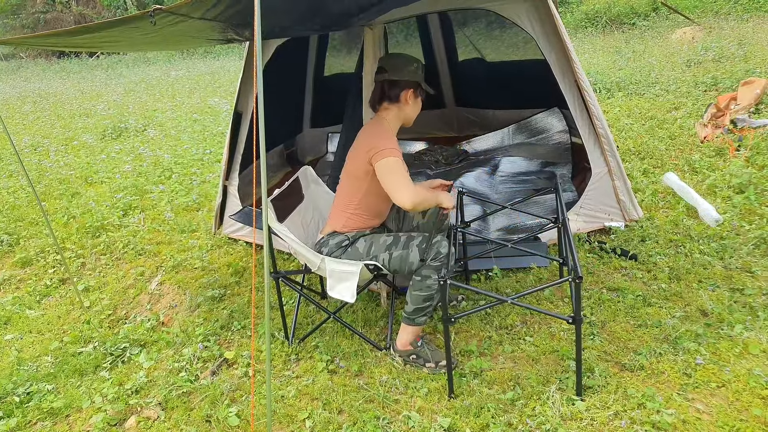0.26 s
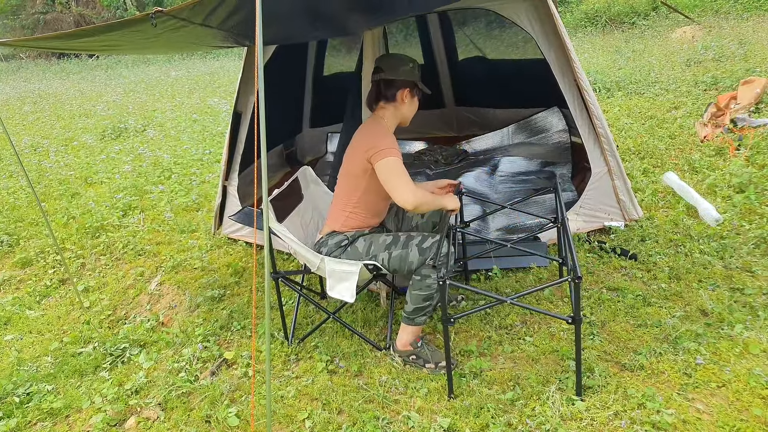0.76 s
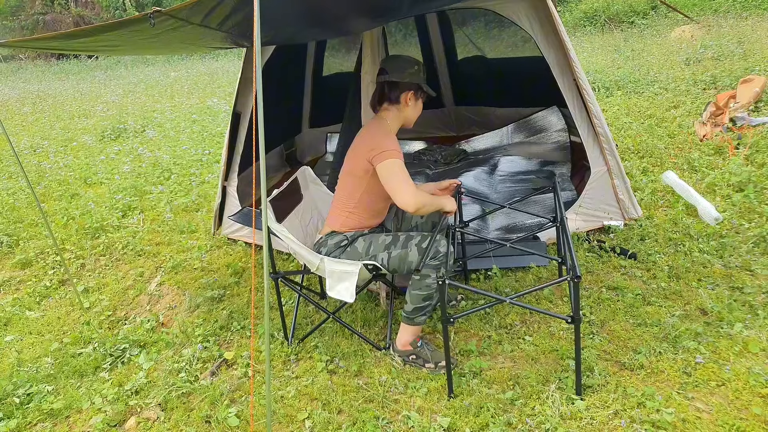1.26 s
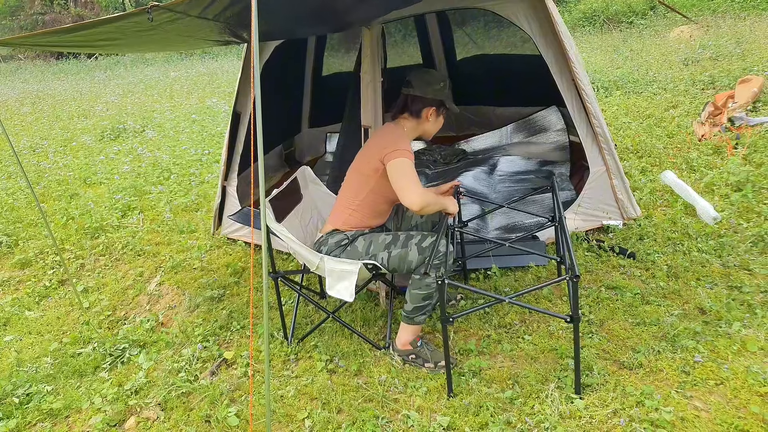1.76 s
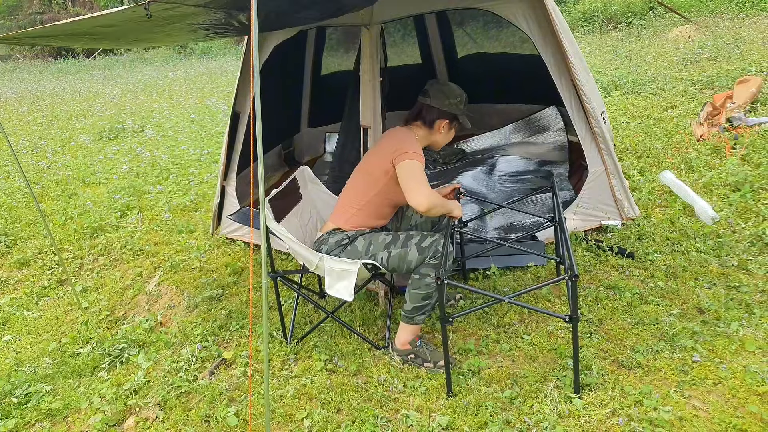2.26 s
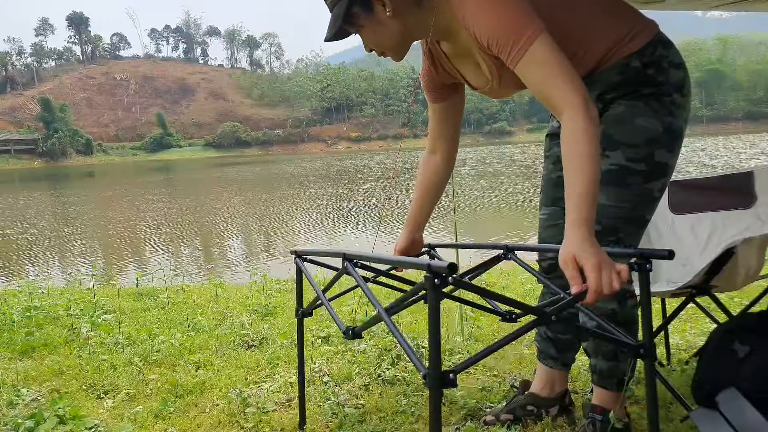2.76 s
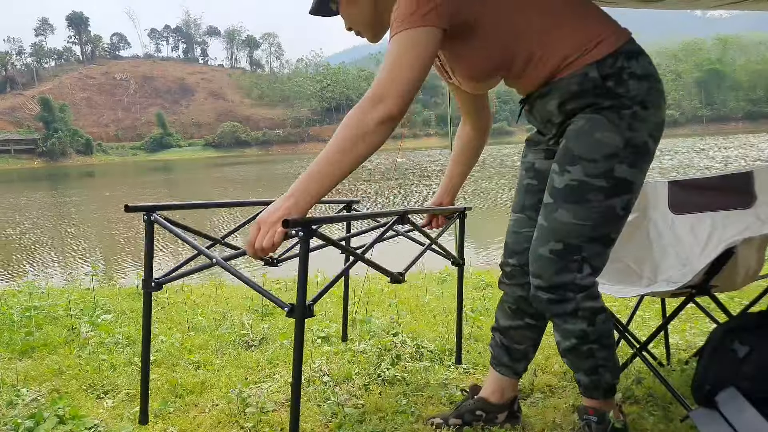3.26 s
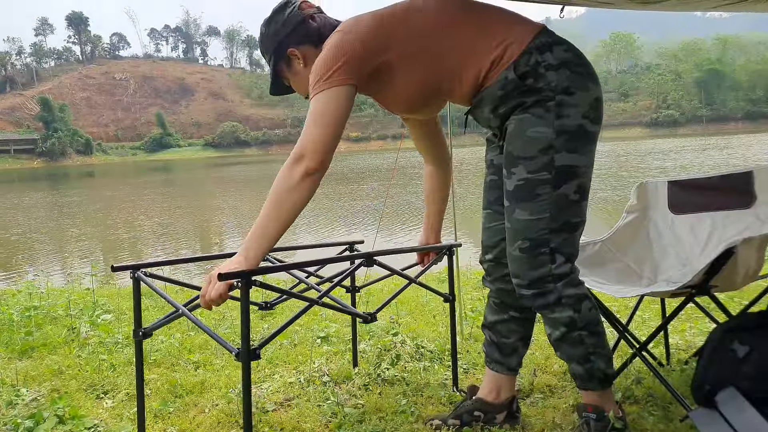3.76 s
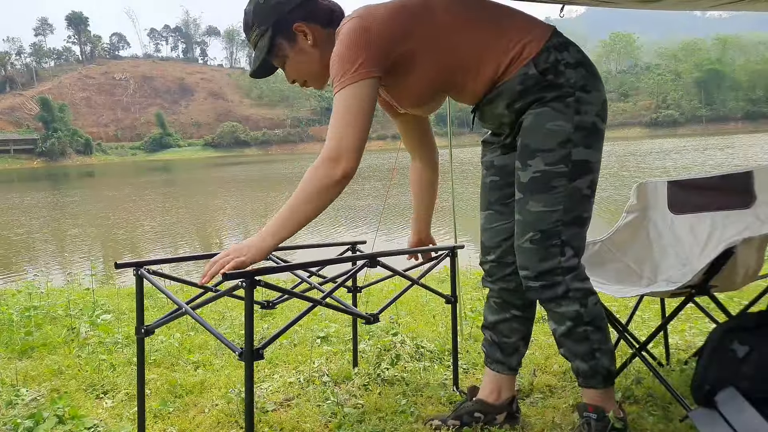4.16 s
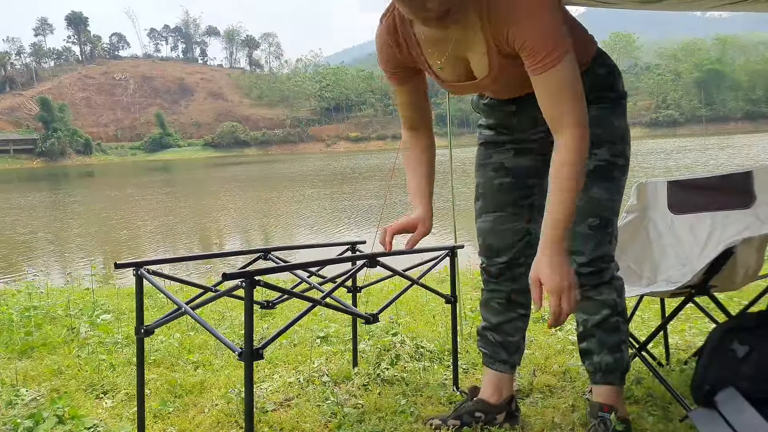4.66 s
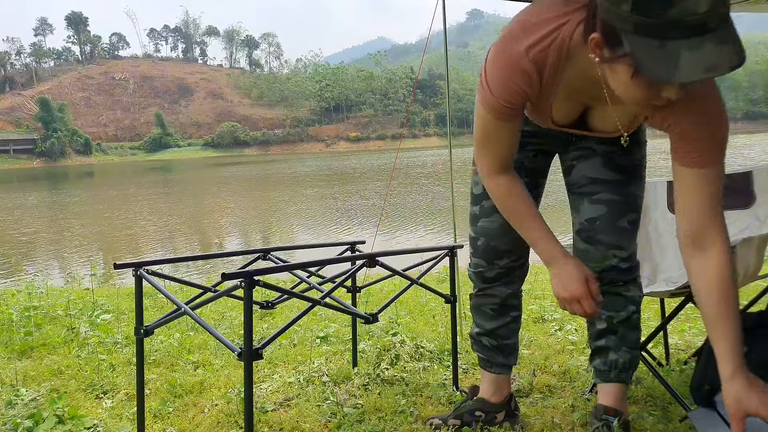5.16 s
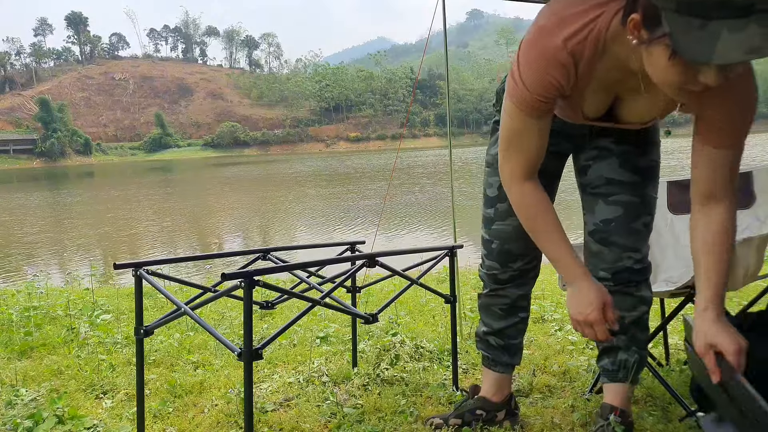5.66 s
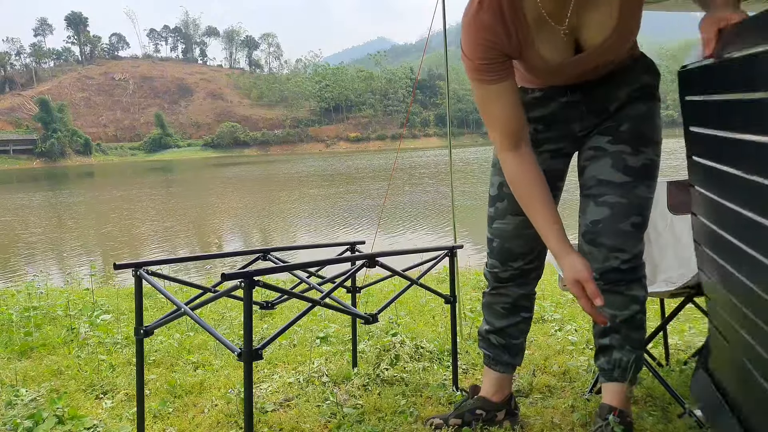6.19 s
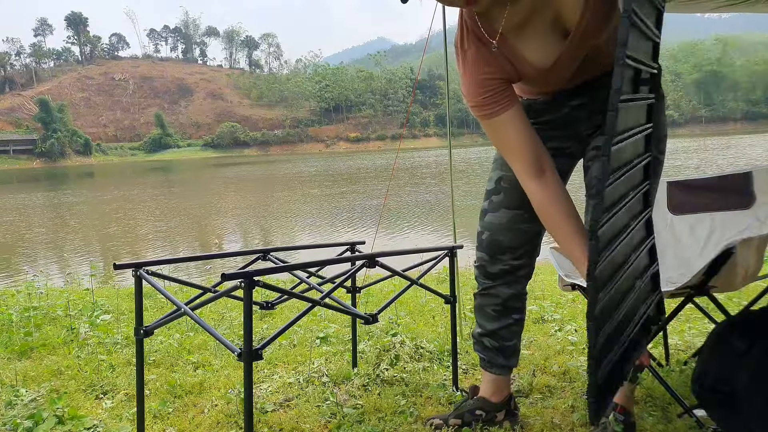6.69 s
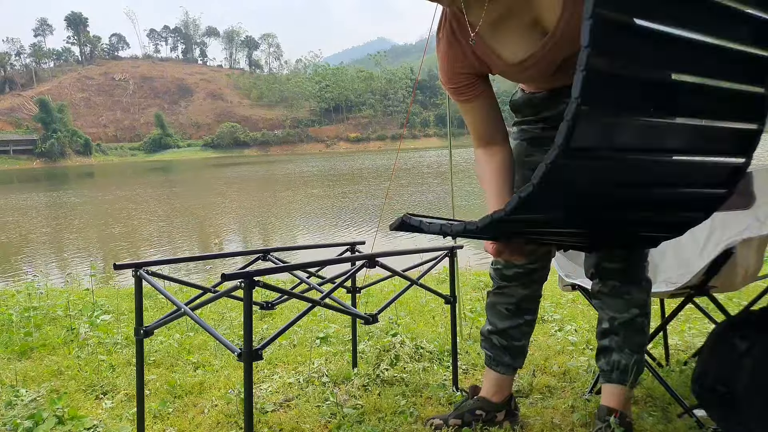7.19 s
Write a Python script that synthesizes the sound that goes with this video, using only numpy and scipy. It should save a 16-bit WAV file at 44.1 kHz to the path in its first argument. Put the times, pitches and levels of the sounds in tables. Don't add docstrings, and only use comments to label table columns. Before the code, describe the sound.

Beside a lake, wind puffs lumpily on the microphone, stronger at left, while small birds chirp. A metal frame ticks faintly, then snaps open with a hard ringing clack. A brief silence cuts to a low distant boat engine, grass insects and a short muffled leg landing. The engine fades, and a roll of aluminium slats slides, rattles and clatters close by.

```python
import sys
import numpy as np
from scipy import signal
from scipy.io import wavfile
from scipy.ndimage import uniform_filter1d

SR = 44100
rng = np.random.default_rng(int(sys.argv[2]) if len(sys.argv) > 2 else 0)


def convert_level_to_amplitude(level_db):
    exponent = np.asarray(level_db, float) / 20
    return 10 ** exponent


def bounce(signal):
    frames = np.transpose(np.atleast_2d(signal))
    limited = np.clip(frames, -1, 1)
    pcm = np.round(limited * 32767).astype(np.int16)
    wavfile.write(sys.argv[1], SR, pcm)


N = 327663

# pitch in Hz, level in dB, t60 in s.
FRAME_MODES = [(1740, -8, 0.25), (2750, -16, 0.065), (2900, -9, 0.23), (2870, -9.5, .06), (5100, -10, 0.15),
               (5670, -20.5, .1)]


def rms_one(x):
    return x / np.sqrt(np.mean(x ** 2) + 1e-20)


def in_time(rows):
    s, *columns = np.transpose(rows)
    return [np.interp(np.arange(N) / SR, s, c) for c in columns]


def at_hz(points, hz):
    points_hz, values = np.array(points).T
    return np.interp(np.log(hz), np.log(points_hz), values)


def between(start_s, end_s, edge_s):
    t = np.arange(N) / SR
    return np.clip(np.minimum(t - start_s, end_s - t) / edge_s, 0, 1)


def drift(rate_hz):
    r = np.exp(-80 * np.pi * rate_hz / SR)
    white = rng.standard_normal(N // 40 + 2002)
    slow = signal.lfilter([1], [1, -2 * r, r * r], white)[2000:]
    return np.interp(np.arange(N) / 40, np.arange(len(slow)), rms_one(slow))


def ring(x, hz, t60_s):
    r, w = convert_level_to_amplitude(-60 / (t60_s * SR)), 2 * np.pi * hz / SR
    return signal.lfilter([0, np.sin(w)], [1, -2 * r * np.cos(w), r * r], x + 1e-18)


def band(x, low_hz, high_hz, order=2):
    edges_hz = [low_hz, min(high_hz, .45 * SR)]
    return signal.sosfilt(signal.butter(order, edges_hz, "band", fs=SR, output="sos"), x)


def half_octaves(spectrum):
    edges_hz = 24 * 2 ** np.arange(0, 9.6, .5)
    lowest_hz, highest_hz = spectrum[0][0], spectrum[-1][0]
    return [(a, b, np.sqrt(a * b)) for a, b in zip(edges_hz, edges_hz[1:])
            if lowest_hz < a * 1.2 and a < highest_hz]


def pan(pan_db):
    return convert_level_to_amplitude([[pan_db / 2], [-pan_db / 2]])


def contacts(size, spread_db, own):
    grains = np.repeat(rng.standard_normal(size // 40 + 1), 40)[:size]
    clumps = np.repeat(rng.standard_normal(size // 200 + 1), 200)[:size]
    clumps = uniform_filter1d(clumps, size=100)
    shared, left, right = rng.standard_normal((3, size))
    scattered = signal.lfilter([1, -1], [1, -.85], [left, right])
    return rms_one(convert_level_to_amplitude(spread_db * (grains + clumps)) * (shared + own * scattered))


def jingle(burst):
    loose_db, loose_t60_s = -48, .035
    level, damping, pitch = rng.random((3, 30, 1))
    t = np.arange(SR // 20) / SR
    decay_db = 60 * t / (loose_t60_s * (.5 + damping))
    parts = convert_level_to_amplitude(12 * level - 6 - decay_db) * np.sin(2 * np.pi * 1200 * 7 ** pitch * t)
    echo = signal.fftconvolve(burst, parts.sum(0)[None], axes=1)[:, :burst.shape[1]]
    return burst + convert_level_to_amplitude(loose_db) * echo


def registers(low_db, high_db):
    return convert_level_to_amplitude(np.array([low_db, 0, high_db]) + np.array([6, 0, -4]))[:, None, None]


def metal(blows, shakes, modes, ring_db, ping_db, lag_samples, pan_db,
          rattle_t60_s, ping_cycles, lows_end_hz, slide=None):
    # frequency in Hz, level in dB per Hz.
    metal_colour = [(150, 5), (300, 2), (600, 3), (1200, 0.5), (2500, -0.5), (4500, 1), (7000, 6),
                    (10500, -1.5), (14500, 5)]
    crack_db = 1.5
    shake_rise_share = 0.64
    spot_db = 2.4
    first = max(0, int((min(blows + shakes)[0] - .2) * SR))
    size = min(N, int((max(blows + shakes)[0] + .5) * SR)) - first
    drive, pings = np.zeros((3, 2, size + SR)), np.zeros((2, size + SR))
    t = np.arange(int(.35 * SR)) / SR

    for s, peak_db, low_db, high_db, hz in blows:
        at = int(s * SR) - first
        decay = convert_level_to_amplitude(-60 * t / rattle_t60_s) + convert_level_to_amplitude(4.0 - 60 * t / .012)
        shape = (1 - np.exp(-t / .0006)) * decay
        burst = jingle(convert_level_to_amplitude(peak_db - 6.0) * shape * contacts(len(t), spread_db=2.0, own=0.89))
        burst[:, :3] += convert_level_to_amplitude(peak_db + crack_db)
        drive[..., at:at + len(t)] += registers(low_db, high_db) * burst
        pings[:, at:at + len(t)] += ring(burst * convert_level_to_amplitude(-60 * t / 0.022), hz, ping_cycles / hz)

    for s, peak_db, low_db, high_db, t60_s in shakes:
        at = max(0, int((s - .1) * SR) - first)
        shape = convert_level_to_amplitude(-60 * np.maximum((.1 - t) / (shake_rise_share * t60_s), (t - .1) / t60_s))
        burst = jingle(convert_level_to_amplitude(peak_db - 0.65) * shape * contacts(len(t), spread_db=1.5, own=1.0))
        drive[..., at:at + len(t)] += registers(low_db, high_db) * burst

    drive, pings = drive[..., :size], pings[:, :size]
    if slide:
        level_db = in_time(slide)[0][first:first + size]
        rub = convert_level_to_amplitude(level_db - 7) * contacts(size, spread_db=1.2, own=0.8)
        drive = drive + registers(low_db=5, high_db=-1.5) * rub

    push = band(drive[0], 150, lows_end_hz, order=3)
    push = push - band(drive[1], lows_end_hz, 5430, order=3)
    push = push + band(drive[2], 5200, 16000, order=3)
    body = np.zeros((2, size))
    for k, (low_hz, high_hz, hz) in enumerate(half_octaves(metal_colour)):
        body += (-1) ** k * convert_level_to_amplitude(at_hz(metal_colour, hz)) * band(push, low_hz, high_hz)
    spots = rng.standard_normal((len(modes), size // 1500 + 1))
    spots = np.repeat(spots, 1500, axis=1)[:, :size]
    for (hz, db, t60_s), spot in zip(modes, spots):
        body += convert_level_to_amplitude(db + ring_db) * ring(push * convert_level_to_amplitude(spot_db * spot), hz, t60_s)
    body += convert_level_to_amplitude(ping_db) * pings

    out = np.zeros((2, N))
    out[:, first:first + size] = body * pan(pan_db)
    out[0] = np.roll(out[0], lag_samples)
    return out


def thuds(rows, lag_samples, pan_db):
    out = np.zeros(N)
    for s, db, hz, t60_s in rows:
        at = int(s * SR)
        click = np.zeros(min(SR // 4, N - at))
        click[:6] = convert_level_to_amplitude(db) / 6
        out[at:at + len(click)] -= ring(click, hz, t60_s)
    return np.array([np.roll(out, lag_samples), out]) * pan(pan_db)


def rings(rows, lag_samples, pan_db):
    rise_s, wobble = .003, .7
    out = np.zeros((2, N + SR))
    t = np.arange(SR // 4) / SR
    for s, db, hz, t60_s in rows:
        jog = uniform_filter1d(rng.standard_normal((2, len(t))), size=300) * np.sqrt(300) * wobble
        envelope = convert_level_to_amplitude(db + 4.8 * jog[0] - 60 * t / t60_s) * (1 - np.exp(-t / rise_s))
        tone = envelope * np.sin(2 * np.pi * hz * t + jog[1])
        for side, (late, gain_db) in enumerate([(lag_samples, pan_db / 2), (0, -pan_db / 2)]):
            at = int(s * SR) + late
            out[side, at:at + len(t)] += convert_level_to_amplitude(gain_db) * tone
    return out[:, :N]


def frame_opens():
    # start in s, peak in dB, lows and highs in dB relative, pitch in Hz of the loose part that pings.
    frame_blows = [
        (0.002, -56, -1.5, -11, 5340),
        (0.741, -64, -6, -20, 2400),
        (0.887, -64, -5, -9, 3043),
        (1.256, -73, 0, 0, 2400),
        (1.911, -65.5, -2, -29, 1435),
        (2.018, -60.5, -0.5, -22.5, 2210),
        (2.1174, -50, -4, -8, 3550),
        (2.1255, -28, -5, 0, 2840),
    ]
    # peak time in s, peak in dB, lows and highs in dB relative, t60 in s.
    frame_shakes = [
        (0.0864, -71, -6.5, -5, 0.35),
        (2.2447, -65, 1, -13, 0.27),
    ]
    # start in s, level in dB, pitch in Hz, t60 in s.
    strut_clacks = [(2.1248, -34, 2850, 0.033), (2.1262, -26, 4300, 0.018), (2.127, -31, 1250, 0.046),
                    (2.127, -29, 2116, 0.037), (2.127, -27.5, 2476, .035), (2.128, -31, 1755, .06),
                    (2.1465, -35.5, 400, .02)]
    # start in s, level in dB, pitch in Hz, t60 in s.
    strut_rings = [(2.03, -68, 6300, 0.076), (2.035, -69, 5230, 0.11), (2.128, -36.5, 2790, 0.13),
                   (2.128, -35, 2846, 0.051), (2.128, -44, 2920, 0.17), (2.135, -46, 3230, 0.12),
                   (2.145, -49, 1685, 0.075), (2.128, -45, 5100, 0.15), (2.13, -58, 5730, 0.083),
                   (2.13, -44.5, 4690, 0.12), (2.13, -53, 7200, .09), (2.2, -70, 7900, .1),
                   (2.235, -61, 5224, 0.066), (2.24, -61, 3780, 0.031), (2.256, -65, 5500, 0.065),
                   (2.17, -52, 2810, 0.13), (2.268, -68, 1900, .04), (2.333, -63, 7360, 0.028)]
    out = metal(frame_blows, frame_shakes, FRAME_MODES, ring_db=-40.5, ping_db=-24.5, lag_samples=0, pan_db=-4.5,
                rattle_t60_s=0.13, ping_cycles=160, lows_end_hz=901)
    out += thuds(strut_clacks, lag_samples=0, pan_db=-3.5)
    return out + rings(strut_rings, lag_samples=1, pan_db=-4)


def legs_set_down():
    # start in s, peak in dB, lows and highs in dB relative, pitch in Hz of the loose part that pings.
    leg_blows = [
        (2.7173, -67, -4, 0, 4200),
        (3.195, -68, 3, -12.5, 770),
        (3.237, -45, -8, -3, 805),
        (3.319, -69, 11, -15, 594),
        (3.5982, -59, -2, -18, 610),
    ]
    # peak time in s, peak in dB, lows and highs in dB relative, t60 in s.
    leg_shakes = [
        (2.869, -77.5, 3.5, 5.5, 0.26),
        (3.209, -77, 12.5, 0, 0.17),
        (3.263, -69.5, 12, -3, 0.26),
        (3.6167, -64, 2, -7.5, 0.16),
        (4.5475, -81.5, -4.5, 11.5, 0.23),
    ]
    return metal(leg_blows, leg_shakes, FRAME_MODES, ring_db=-73.0, ping_db=-15, lag_samples=2, pan_db=-3.5,
                 rattle_t60_s=0.035, ping_cycles=21, lows_end_hz=850)


def slats_lifted():
    # start in s, peak in dB, lows and highs in dB relative, pitch in Hz of the loose part that pings.
    slat_blows = [(5.597, -47, -1, 6.5, 3860), (5.7172, -33, -12, -6.5, 4470),
                  (5.9919, -24, -6.5, -16, 1520), (6.22, -35.5, 5.5, -3.5, 873),
                  (6.242, -27, -5.5, -31.5, 955), (6.336, -30, -12, -0.5, 1740),
                  (6.3766, -22.5, -11.5, -4.5, 4280), (6.4715, -65, 16, 1, 714),
                  (6.5143, -66, 15.5, 10, 706), (6.6566, -41.5, -13.5, -0.5, 4350),
                  (6.89, -50, -15, -18, 4000)]
    # peak time in s, peak in dB, lows and highs in dB relative, t60 in s.
    slat_shakes = [(5.2275, -45, -13, -6, 0.062), (5.2652, -43, -17, -14, 0.1), (5.3, -56, 3, -6, 0.27),
                   (5.4678, -51.5, 5.5, -9.5, 0.2), (5.504, -33.5, -7.5, -12, 0.1),
                   (5.531, -36, -1, -21, 0.09), (5.589, -47, 2, -1, 0.03), (5.612, -60.5, 6, -19, 0.19),
                   (5.7661, -43.5, 2.5, -21, 0.22), (5.7861, -37, -12, -7.5, 0.036),
                   (5.8108, -43, 2.5, -4.5, 0.25), (5.8386, -46.5, 6, -12, 0.14),
                   (6.0197, -45.5, 8, -6, 0.23), (6.258, -36.5, -6, -1, 0.13),
                   (6.276, -34.5, -8.5, -1.5, 0.11), (6.295, -33.5, -13, -14, 0.13),
                   (6.667, -42, -39, 1.5, 0.067), (6.7051, -46.5, -18.5, 1.5, 0.11),
                   (6.776, -52.5, -43, -6.5, 0.25), (6.924, -56.5, -6.5, -17, 0.34),
                   (7.1209, -56.5, -32, -9, 0.6), (7.1727, -40, -13, -9, 0.17), (7.183, -35, -16, -4, 0.07),
                   (7.195, -27.5, -22, -10, 0.054)]
    # time in s, level in dB.
    slide_curve = [(5.15, -81), (5.26, -61), (5.42, -71.5), (5.56, -48.5), (5.68, -68), (5.85, -63),
                   (6.31, -48.5), (6.6, -63.5), (7.43, -79.5)]
    # pitch in Hz, level in dB, t60 in s.
    slat_modes = [(533, -12, .07), (650, -16, .058), (915, -4, .09), (948, -1, .16), (985, 0, .1),
                  (1050, -4, .07), (1530, -3, .07), (1640, -10, .05), (2080, -14, .05), (2745, -8, .1),
                  (2830, -7, .06), (3600, -10, .04), (3950, -9, .04), (4900, -11, .03)]
    # start in s, level in dB, pitch in Hz, t60 in s.
    slat_clacks = [(5.9915, -28, 1525, 0.099), (5.9917, -28.5, 2855, 0.077), (5.9915, -26, 3950, .04),
                   (5.9915, -28, 4900, .02), (5.994, -34, 1112, 0.12), (6.008, -33, 552, 0.043),
                   (5.7225, -34, 950, 0.18), (5.7225, -33, 1240, 0.048), (5.728, -33, 2800, 0.054),
                   (5.764, -40, 4710, .03), (5.782, -33, 1510, .05), (5.8124, -40, 4900, .03),
                   (6.221, -35, 1504, .05), (6.221, -33, 949, 0.14), (6.243, -33, 1519, .05),
                   (6.243, -32, 4340, .04), (6.3372, -30, 1690, 0.05), (6.3767, -22, 3490, 0.026),
                   (6.3767, -30.5, 4300, 0.027), (7.1763, -35, 3770, .03), (7.158, -43, 1510, .03),
                   (7.1915, -27, 964, .04), (6.6565, -45, 2760, .3), (6.655, -40, 4300, .04),
                   (7.197, -26.5, 4900, .02), (7.186, -34, 1420, .04), (7.195, -29, 3970, 0.027),
                   (7.199, -28, 2070, .035), (5.4982, -40, 1766, .04), (5.4757, -38.5, 2850, .04)]
    # start in s, level in dB, pitch in Hz, t60 in s.
    slat_rings = [(5.218, -44, 3610, 0.058), (5.222, -47, 3970, 0.086), (5.245, -45.5, 980, 0.086),
                  (5.26, -41.5, 3780, .05), (5.263, -35, 1540, 0.055), (5.263, -39, 2750, 0.097),
                  (5.275, -43, 1038, 0.12), (5.325, -48, 980, 0.15), (5.468, -39, 2790, .07),
                  (5.528, -33, 650, 0.09), (5.54, -37, 1730, 0.034), (5.596, -33, 3975, 0.037),
                  (5.604, -38.5, 1050, .06), (5.724, -44, 2770, .1), (5.72, -38, 4440, 0.048),
                  (5.78, -36, 3400, 0.053), (5.783, -51, 1520, .05), (5.788, -35, 2900, .06),
                  (5.808, -32, 960, 0.15), (5.834, -45, 2180, 0.049), (5.992, -35, 3930, 0.05),
                  (5.994, -45, 2720, .07), (5.994, -37, 1536, 0.075), (6.012, -30, 945, 0.13),
                  (6.042, -39, 2790, 0.1), (6.085, -47, 950, 0.44), (6.04, -42, 1670, .1),
                  (6.245, -40, 2750, .06), (6.275, -38, 2730, .12), (6.245, -40, 4090, .06),
                  (6.278, -53.5, 3590, 0.045), (6.892, -60, 3640, .05), (6.917, -42, 1950, 0.039),
                  (6.928, -52, 977, 0.093), (6.953, -52.5, 3070, 0.047), (7.186, -29.5, 1395, 0.045),
                  (7.196, -32, 2080, .05), (7.192, -42, 3800, 0.048), (7.235, -56, 970, .25),
                  (7.405, -72, 4030, 0.088)]
    out = metal(slat_blows, slat_shakes, slat_modes, ring_db=-37, ping_db=-24.5, lag_samples=11, pan_db=-4.0,
                rattle_t60_s=0.11, ping_cycles=280, lows_end_hz=1760, slide=slide_curve)
    out += thuds(slat_clacks, lag_samples=10, pan_db=-3.5)
    return out + rings(slat_rings, lag_samples=10, pan_db=-2.0)


def knocks():
    # start in s, level in dB, pitch in Hz, t60 in s.
    knock_rows = [(2.1267, -18, 520, 0.013), (2.1275, -54, 221, 0.082), (2.126, -35.5, 1150, 0.013),
                  (3.607, -56, 3100, .04), (3.603, -54, 1500, .05), (3.599, -50, 600, .04),
                  (3.2362, -18.5, 886, 0.012), (3.237, -38, 1120, 0.039), (3.2375, -33, 1450, 0.013),
                  (3.2335, -40, 700, 0.03), (3.237, -43, 380, 0.0205), (5.599, -30, 6600, 0.018),
                  (5.598, -35, 4020, 0.03), (6.378, -30, 530, 0.1), (6.387, -30, 2030, 0.045),
                  (5.465, -38, 990, .05), (6.513, -45, 970, 0.018), (7.229, -46, 52, 0.22),
                  (5.99, -48, 48, 0.29), (2.016, -52, 450, 0.04), (3.194, -56, 900, 0.03),
                  (0.741, -64, 1050, 0.008)]
    return thuds(knock_rows, lag_samples=3, pan_db=-2.5)


def wind():
    # frequency in Hz, level in dB per Hz.
    wind_colour = [(15, -35), (25, 6.5), (59, -3.5), (118, -8.5), (146, -10), (183, -23.5), (281, -17),
                   (500, -47), (650, -65.5), (1100, -120)]
    # peak time in s, level in dB.
    puff_rows = [(0.019, -46), (0.118, -47), (0.249, -50), (0.361, -49), (0.489, -49.5), (0.64, -65),
                 (0.769, -53), (0.873, -47.5), (0.96, -56.5), (1.11, -54.5), (1.2, -52), (1.36, -55.5),
                 (1.439, -51), (1.559, -52), (1.67, -49.5), (1.818, -55.5), (1.93, -49.5), (2.05, -51.5),
                 (2.249, -41.5), (2.34, -43.5)]
    rise_db_per_s, fall_db_per_s, lull_db = 285.5, 130, -63.5
    white = rng.standard_normal((2, 2, N))
    turbulence = np.zeros((2, N))
    for k, (low_hz, high_hz, hz) in enumerate(half_octaves(wind_colour)):
        gain = convert_level_to_amplitude(at_hz(wind_colour, hz) + 3.7 * drift(18))
        turbulence += gain * band(white[k % 2], low_hz, high_hz)
    t, gust_db = np.arange(N) / SR, lull_db
    for s, db in puff_rows:
        fallen_db = np.maximum(rise_db_per_s * (s - t), fall_db_per_s * (t - s))
        gust_db = np.maximum(gust_db, db - fallen_db)
    return convert_level_to_amplitude(gust_db) * rms_one(turbulence) * convert_level_to_amplitude([[4.5], [-11]])


def engine():
    # time in s, firing rate in Hz, level in dB.
    engine_curve = [(2.58, 28.3, -54), (3.07, 27.9, -56), (3.72, 27.5, -60), (3.96, 25.1, -69),
                    (4.05, 24.8, -61), (4.15, 26.2, -57), (4.33, 25.1, -57), (4.8, 23.6, -59),
                    (5.37, 20.5, -66)]
    # multiple of the firing rate, level in dB.
    engine_orders = [(2, -8.5), (3, -6), (4, -8), (5, 0.8), (6, -5), (7, -20), (8, -18), (9, -18),
                     (10, -18), (11, -21), (12, -19)]
    # time in s, pitch in Hz, level in dB.
    pump_curve = [(2.58, 75.4, -67), (2.9, 77.3, -55.5), (3.12, 83.5, -69.5), (3.6, 85.7, -66)]
    surge_hz, surge_top_s, surge_db, stop_s = 3.2, 4.5, 0.5, 5.45
    firing_hz, level_db = in_time(engine_curve)
    level_db = level_db + surge_db * np.cos(2 * np.pi * surge_hz * (np.arange(N) / SR - surge_top_s))
    turn = 2 * np.pi * np.cumsum(firing_hz * (1 + .003 * drift(6))) / SR
    orders = np.zeros(N)
    for k, db in engine_orders:
        phase = k * turn + 1.12 + 0.105 * k * k + 0.0086 * k * k * drift(8.5)
        orders += convert_level_to_amplitude(db + 1.5 * drift(3)) * np.sin(phase)
    hz, drone_db = in_time(pump_curve)
    drone = convert_level_to_amplitude(drone_db) * np.sin(2 * np.pi * np.cumsum(hz) / SR) * between(2.4, 3.7, .15)
    return np.sqrt(2) * (convert_level_to_amplitude(level_db) * orders * between(2.4, stop_s, .1) + drone)


def birds():
    # start in s, kind of call, level in dB, pitch in Hz.
    bird_calls = [(0.628, "chirp", -69, 3520), (0.862, "chirp", -76, 2950), (.64, "chirp", -77, 3300),
                  (1.089, "swoop", -74, 3300), (1.203, "chirp", -67, 3300), (1.222, "chirp", -75, 3000),
                  (1.325, "swoop", -73, 3300), (1.361, "peep", -93, 3700), (1.56, "peep", -82, 1560),
                  (.59, "drawl", -87, 1420), (1.68, "drop", -86, 4650), (1.565, "rise", -88, 5100),
                  (0.945, "chirp", -86, 5000), (1.737, "peep", -89, 3640), (3.912, "chip", -83, 3090),
                  (4.02, "peep", -90, 5030), (4.08, "peep", -87, 5080), (4.1, "chirp", -89, 3800),
                  (4.205, "chip", -89, 3050), (4.432, "chirp", -75, 3620), (4.455, "chirp", -80, 3400),
                  (4.523, "chip", -78, 3080), (4.813, "chip", -76, 3090), (5.122, "chip", -75, 3100)]
    song_notes = {"swoop": [(0, .03, 1, .6, 1), (.024, .03, .59, .575, 4)], "chirp": [(0, .036, 1, .82, 0)],
                  "chip": [(0, .016, 1, .93, 0)], "peep": [(0, .06, 1, .98, 0)],
                  "drawl": [(0, .12, 1, .96, 0)], "drop": [(0, .06, .97, 1, -3), (.05, .04, 1, .9, 0)],
                  "rise": [(0, .06, 1, 1.2, 0)]}
    husky = 0.4
    out = np.zeros((2, N))
    for call_s, kind, call_db, hz in bird_calls:
        for delay_s, length_s, start, end, rel_db in song_notes[kind]:
            t = np.linspace(0, 1, int(length_s * SR))
            flutter = uniform_filter1d(rng.standard_normal((2, len(t))), size=60) * 6.5 * husky
            phase = 2 * np.pi * np.cumsum(hz * (start + (end - start) * t)) / SR
            at = int((call_s + delay_s) * SR)
            out[:, at:at + len(t)] += convert_level_to_amplitude(call_db + rel_db) * np.sin(np.pi * t) ** 0.69 * np.sin(phase + flutter)
    t = np.arange(int(.12 * SR)) / SR
    leaves = rng.standard_normal((2, len(t))) * convert_level_to_amplitude(-23 - 60 * t / 0.24)
    return out + signal.fftconvolve(out, leaves, axes=1)[:, :N]


def insects():
    # phrases of a singer or, at 392 Hz, of a moan (start in s, length in s, level in dB), pitch in
    # Hz, width in Hz.
    singers = [([(2.55, .35, -86), (3.153, .45, -89), (4.0, .32, -86), (4.751, .32, -87),
               (7.034, .27, -80)], 7210, 350), ([(3.17 + .281 * k, .09, -87) for k in range(7)], 4370, 70),
               ([(3.262 + .281 * k, .022, -84) for k in range(7)], 4830, 200), ([(3.9, .07, -86),
               (4.55, .06, -89)], 4300, 60), ([(5.0, .12, -86)], 3950, 120), ([(2.6, .7, -82),
               (3.6, 1.6, -87)], 4500, 800), ([(0, .45, -82)], 5100, 500), ([(.26, .12, -83)], 1560, 150),
               ([(.885, .09, -77)], 2000, 400), ([(4.8, .2, -67)], 392, 50), ([(1.55, .13, -80)],
               1520, 200)]
    out = np.zeros((2, N))
    for phrases, hz, width_hz in singers:
        for s, length_s, db in phrases:
            t = np.linspace(0, 1, int(length_s * SR))
            white = rng.standard_normal((2, len(t)))
            buzz = rms_one(band(white, hz - width_hz / 2, hz + width_hz / 2))
            at = int(s * SR)
            out[:, at:at + len(t)] += convert_level_to_amplitude(db) * buzz * np.sin(np.pi * t ** 1.5) ** .6
    return out


def hum():
    # pitch in Hz, level in dB.
    hum_lines = [(48.5, -65.5), (100, -75)]
    t = np.arange(N) / SR
    return sum(convert_level_to_amplitude(db + 2.5 * drift(1.0)) * np.sin(2 * np.pi * hz * t + 0.35 * drift(1)) for hz, db in hum_lines)


def air(spectrum, patchy_db, start_s, end_s):
    # frequency in Hz, left-right likeness from 0 to 1.
    likeness = [(60, 0.83), (130, 0.48), (300, 0.61), (650, 0.17), (1400, 0.0067)]
    out, span = np.zeros((2, N)), slice(int(start_s * SR), int(end_s * SR))
    white = rng.standard_normal((2, 2, N))[..., span]
    for k, (low_hz, high_hz, hz) in enumerate(half_octaves(spectrum)):
        mid, side = band(white[k % 2], low_hz, high_hz)
        alike = np.clip(at_hz(likeness, hz), -1, 1)
        gain = convert_level_to_amplitude(at_hz(spectrum, hz) + patchy_db * drift(18)[span])
        out[:, span] += gain * (np.sqrt(1 + alike) * mid + np.sqrt(1 - alike) * side * [[1], [-1]])
    return out / np.std(out[:, span])


def rumble():
    # time in s, level in dB.
    rumble_curve = [(2.6, -51), (3.2, -53), (5.3, -50.5), (5.8, -45), (6.4, -46), (6.65, -53), (7.1, -52),
                    (7.43, -50)]
    # frequency in Hz, level in dB per Hz.
    rumble_colour = [(18, -43), (30, -1), (70, 2.5), (163, 0), (266, -18.5), (363, -9), (600, -33),
                     (780, -62), (1320, -120)]
    return convert_level_to_amplitude(in_time(rumble_curve)[0] - 9.5) * air(rumble_colour, 4.0, 0.53, 9.4)


def first_air():
    # frequency in Hz, level in dB per Hz.
    first_colour = [(120, -33), (200, -2), (303, -6.5), (1050, -19.5), (1570, -17), (2750, -26.5),
                    (4640, -28), (7020, -28.5), (8410, -53.5), (11200, -27.5), (15000, -29)]
    return convert_level_to_amplitude(-72.5) * air(first_colour, 1.32, 0, 3.7) * convert_level_to_amplitude([[-.8], [.8]])


def second_air():
    # frequency in Hz, level in dB per Hz.
    second_colour = [(260, -12), (450, -1), (669, -12), (1070, -11), (4440, -18.5), (6040, -24.5),
                     (7310, -22), (8340, -23), (11400, -26.5), (15000, -17.5)]
    return convert_level_to_amplitude(-77) * air(second_colour, 0.56, 2.4, N / SR)


def bass_cut(x):
    return signal.sosfilt(signal.butter(3, 40, "high", fs=SR, output="sos"), x)


def scene():
    cut_s, fade_from_s, fade_to_s = 2.352, 2.488, 2.545
    t = np.arange(N) / SR
    first = frame_opens() + wind() + first_air()
    second = (engine() + rumble() + second_air()) * convert_level_to_amplitude([[-1.6], [1.6]])
    second += legs_set_down() + slats_lifted()
    around = knocks() + birds() + insects() + hum()
    fade_in = np.clip((t - fade_from_s) / (fade_to_s - fade_from_s), 0, 1) ** 5.7
    return bass_cut(first + around) * between(-1, cut_s, 12 / SR) + bass_cut(second + around) * fade_in


def roll_off(x):
    return signal.sosfilt(signal.butter(12, 16630, fs=SR, output="sos"), x)


def record(dry):
    mix = dry - 0.88 * band(dry, 8140, 9480, order=1)
    mix = signal.sosfilt(signal.cheby2(10, 30, 15600, fs=SR, output="sos"), mix)
    return roll_off(mix)


dry = scene()
out = record(dry)
bounce(out)
```